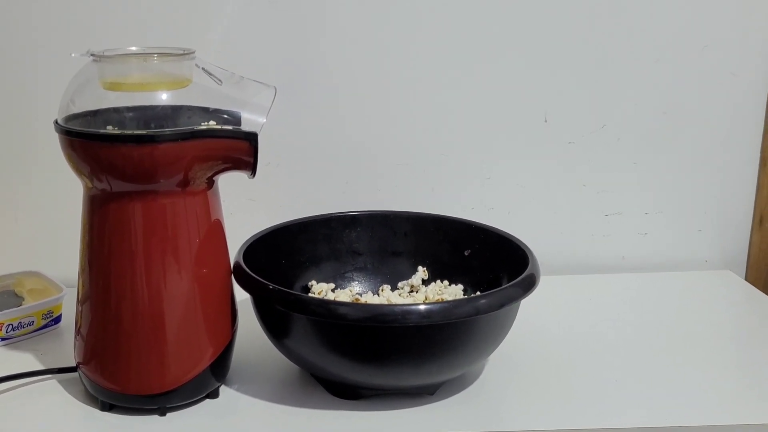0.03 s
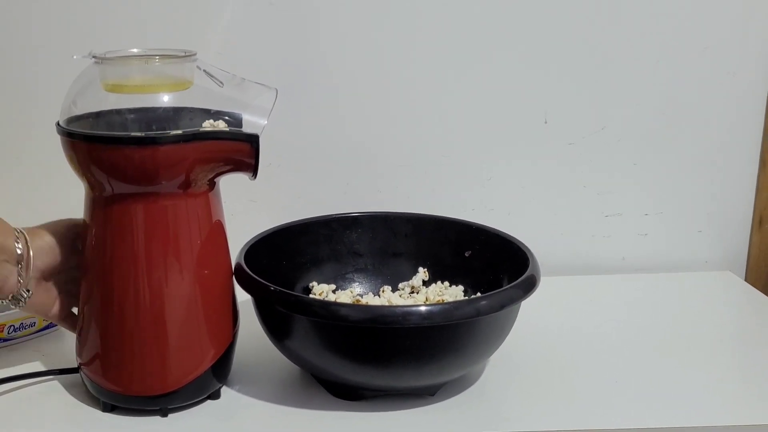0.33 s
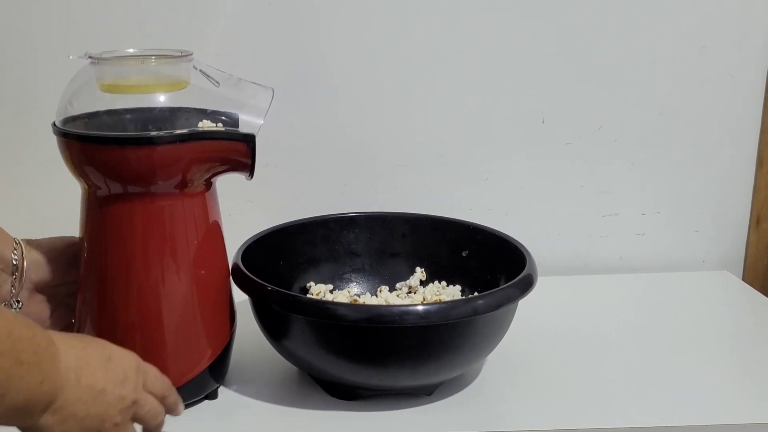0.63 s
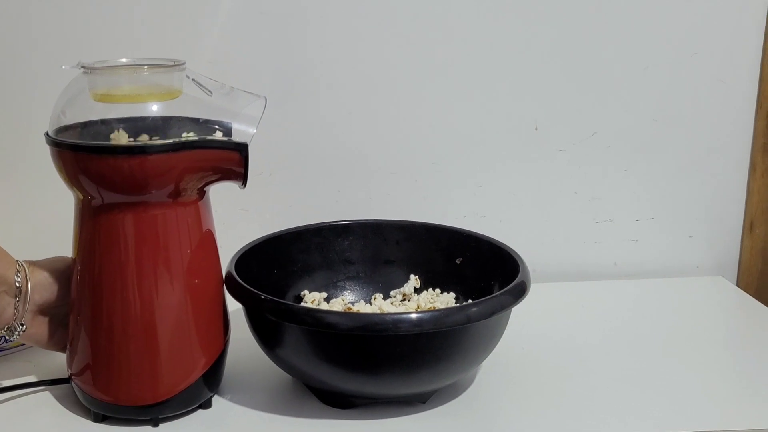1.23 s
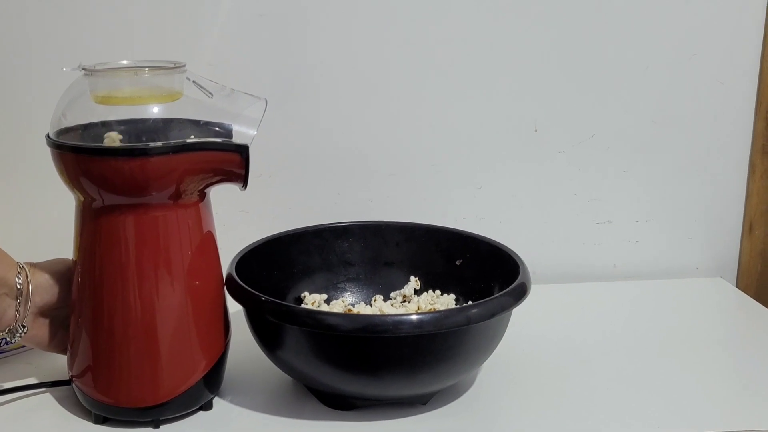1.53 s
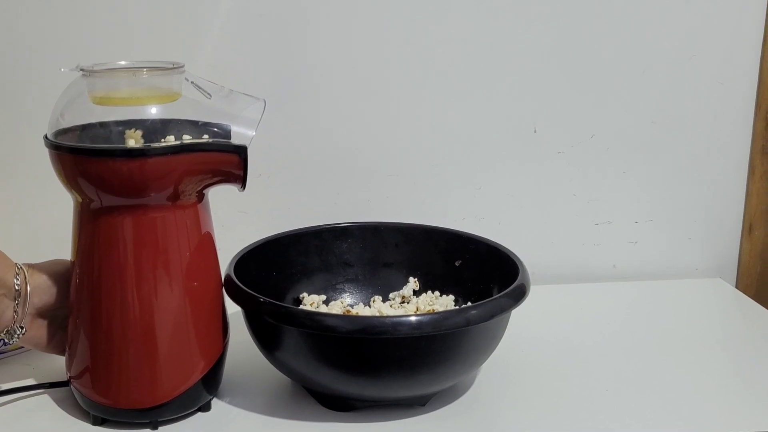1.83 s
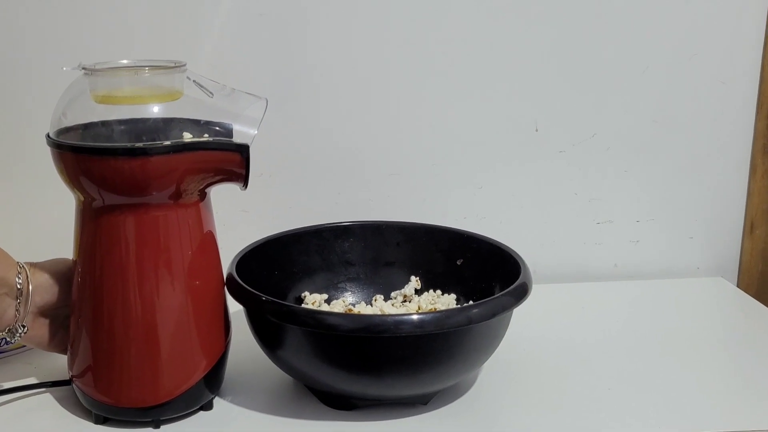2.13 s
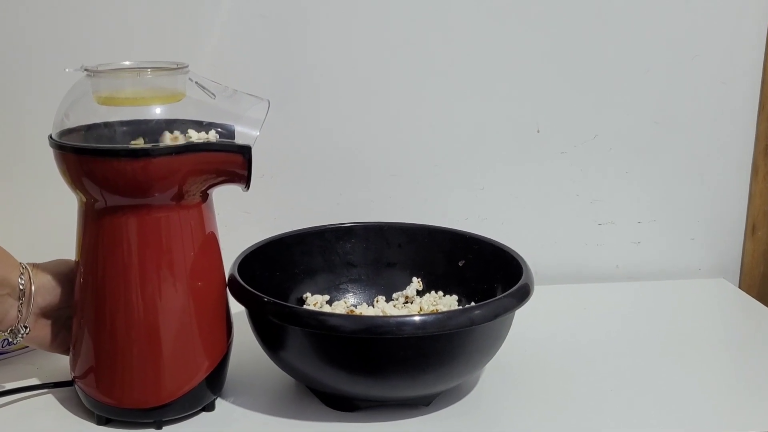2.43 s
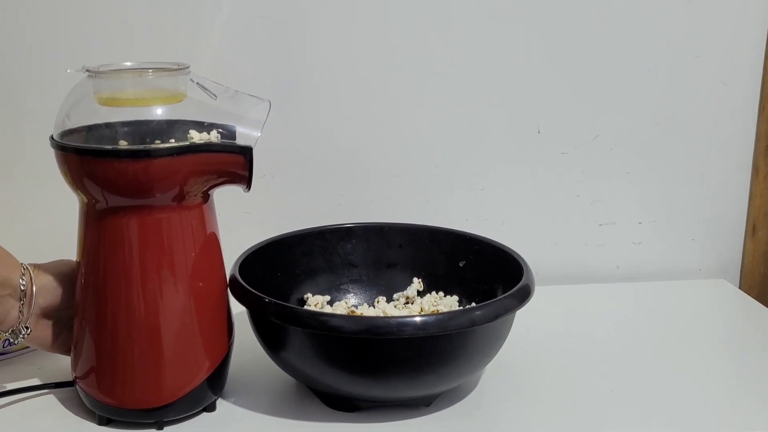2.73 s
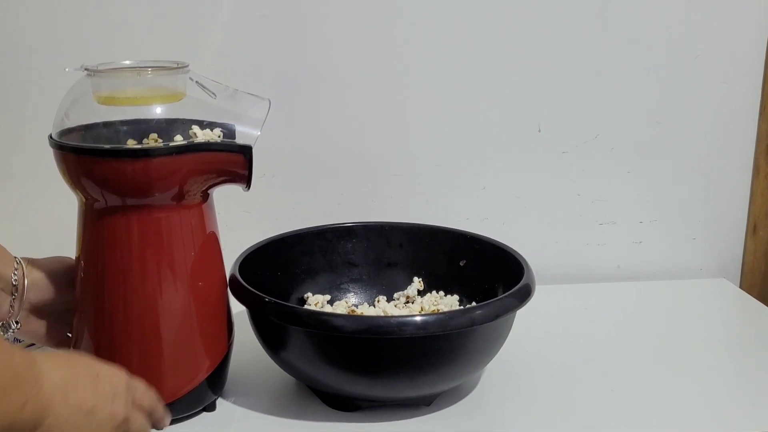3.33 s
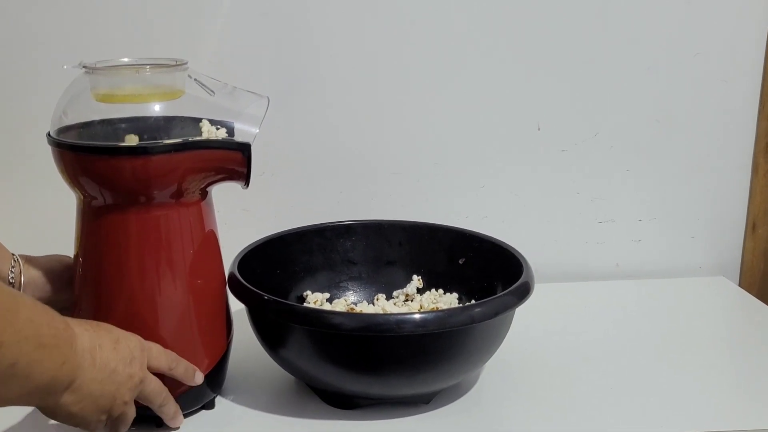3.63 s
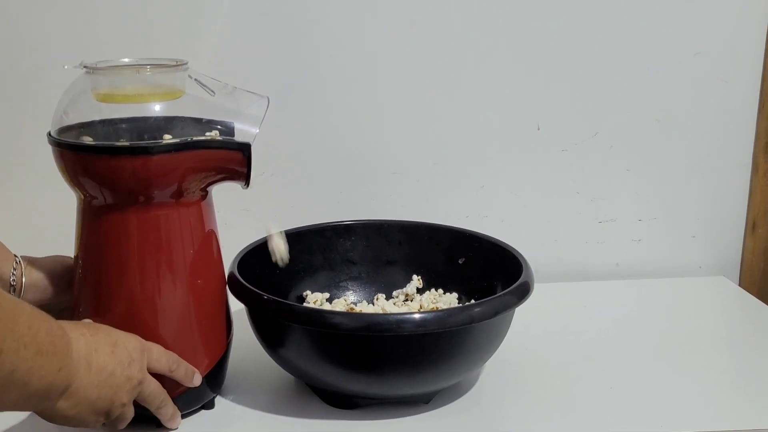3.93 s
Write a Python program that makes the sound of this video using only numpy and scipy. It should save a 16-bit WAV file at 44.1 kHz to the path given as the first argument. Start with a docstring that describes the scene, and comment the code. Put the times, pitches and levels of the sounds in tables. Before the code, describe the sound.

A hot air popcorn machine roars steadily in a small room, with a faint motor whine and kernels rattling against metal. A few kernels pop in the first half, and one more pops near the end.

```python
"""A hot-air popcorn machine in a small room. From the start, fan air roars through housing, chute and
hood over a faint motor whine, and swirling kernels rattle on the metal chamber in quick surges.
Four kernels burst between 0.7 and 1.7 s, each a crack and a puff of steam. At 2.25 s the sound drops
out for 12 ms; the rattle returns slightly louder, with deeper surges. A last kernel pops at 3.4 s,
and a faint whistle swells near the end."""
import sys
import numpy as np
from scipy import signal
from scipy.fft import rfft, irfft, next_fast_len
from scipy.io import wavfile
from scipy.ndimage import uniform_filter1d, map_coordinates

SR = 44100
rng = np.random.default_rng(int(sys.argv[2]) if len(sys.argv) > 2 else 0)


def transcribe(u):
    """Save the signal u as a 16-bit wav file named by the first command-line argument.

    u: samples, shape (n,) or (channels, n), limited to [-1, 1]; the rate is SR.
    q: integer samples, one column per channel.
    """
    v = np.clip(np.atleast_2d(u).T, -1, 1)
    q = np.round(v * 32767).astype(np.int16)
    wavfile.write(sys.argv[1], SR, q)


N = 176400

# Air noise spectra: freq_hz, relative_db
ROAR_SPECTRUM = [(12, -60), (25, -26), (58, -5), (98, -18.5), (148, -7.5), (190, -13.5), (225, -1.7),
                 (330, -0.5), (600, -5), (720, -8.5), (790, -7.5), (930, -4), (1030, -9.5), (1300, -20.5),
                 (1700, -47), (2800, -100)]
RUSH_SPECTRUM = [(800, -44), (1200, -1.5), (1300, 0.0), (1700, -6), (2000, -3.5), (2400, -4.5),
                 (3050, -8.5), (3600, -6.5), (4600, -28), (7000, -100)]
DRONE_SPECTRUM = [(700, -80), (815, -27), (840, 1.5), (857, -10.5), (873, 0.5), (905, -23.5), (1050, -80)]
WHISTLE_SPECTRUM = [(3600, -70), (3870, -14), (3930, 0), (3990, -14), (4300, -70)]
# Spectra of wall hits, hull crack and steam thump: freq_hz, relative_db
RATTLE_SPECTRUM = [(2000, -50), (3200, -13), (3600, -6), (5500, 1), (7000, -1.5), (9000, -9), (10100, -9.5),
                   (11500, -0.5), (13000, -12.5), (14400, -12.5), (15600, -15.5)]
CRACK_SPECTRUM = [(800, -22), (2400, -6.5), (3300, -12), (4000, -4), (4550, 2), (5800, 5.5), (7000, -0.5),
                  (9000, -4.5), (11500, 1), (15000, -18)]
THUMP_SPECTRUM = [(80, -30), (150, -16), (190, -16), (260, 1), (330, -2.5), (410, 0), (550, -7), (800, -19),
                  (1400, -24), (3000, -50)]
# Resonances of housing and chute, plastic hood, metal chamber: centre_hz, width_hz, boost_db
HOUSING_MODES = [(239, 40, 5.0), (282, 34, 7), (403, 41, 3.5), (436.4, 39, 8.5), (490.4, 22, 7),
                 (517, 31, 8.5), (736, 33, 4.5), (790.6, 65, 14.5), (839, 24, 6), (874.6, 49, 10.5),
                 (920.3, 49, 11.5), (977, 30, 8.5), (1017, 16, 3), (1053, 22, 5.5), (1126, 60, 6.5),
                 (1218, 63, 11.5)]
HOOD_MODES = [(1348, 28, 1.5), (1447, 42, 7.5), (1620, 86, 6), (2142, 19, 9.5), (2260, 32, 4.5),
              (2333, 68, 8.5), (2399, 45, 7), (2474, 34, 9), (2700, 160, 3.5), (2940, 74, 3)]
CHAMBER_MODES = [(3926, 140, 8.5), (4180, 140, 5), (4440, 190, 7.5), (5030, 150, 4.5), (5340, 81, 4.5),
                 (5740, 440, 3.5), (6530, 220, 4.5), (7750, 270, 4), (8280, 126, 8.5), (9190, 106, 6),
                 (9431, 300, 4), (10730, 138, 3.5), (11830, 100, 5.5), (12880, 119, 12)]
# Drift about the roar's base level: time_s, offset_db
ROAR_DRIFT_DB = [(0, 0), (.7, 0.5), (1.2, 0.24), (1.9, 0), (2.6, 1.04), (3.2, 0.5), (4, 0.9)]
# Source envelopes: time_s, level_db
RUSH_DB = [(0, -35), (1, -35.5), (2.24, -35.5), (2.28, -34.5), (3, -34), (4, -34.5)]
DRONE_DB = [(0, -32.5), (.28, -24), (.42, -32), (.62, -26), (1.05, -36), (1.65, -28.5), (2.1, -28.5),
            (2.6, -29.5), (3.05, -31.5), (3.22, -24), (3.5, -26), (3.62, -27.5), (3.8, -24), (4, -25)]
WHISTLE_DB = [(0, -58), (3.1, -54), (3.4, -49), (3.75, -42), (4, -53)]
RATTLE_DB = [(0, -33), (.6, -33), (1.2, -33), (1.7, -32.5), (2.24, -32.5), (2.28, -31.5), (2.88, -30.5),
             (3.25, -31.5), (3.68, -32), (4, -32)]
SHAFT_DB = [(0, -36), (.7, -40.5), (1.3, -48), (2, -50), (2.9, -44), (3.1, -35.5), (4, -36)]
MAINS_DB = [(0, -66), (1, -55.5), (2.65, -48.5), (4, -55.5)]
# Rattle surges: time_s, depth_db
SURGE_DEPTH_DB = [(0, .7), (.7, 1.5), (1.2, 1.1), (1.7, 1.4), (2.24, 1.2), (2.27, 2.5)]
# Bursting kernels: start_s, crack_db, length_s, brightness_db_per_octave, thump_db
BURSTS = [(0.7202, -21.5, 0.015, -6, -17), (1.2905, -20.5, 0.0068, -3.2, -18), (1.5883, -16, 0.006, 3, -22),
          (1.632, -32, 0.0036, 10, -42), (3.383, -26, 0.0093, 3, -41)]
# Tones held by the air stream: pitch_hz, level_db, waver_hz
HOUSING_TONES = [(435.3, -39, 4.1), (492, -36.5, 4)]
# Motor speed unsteadiness: time_s, speed_fraction
SPEED_WANDER = [(0, 0.003), (2.2, 0.00252), (2.3, .0006), (4, 0.00092)]
# Motor whine: shaft_multiple, level_db
WHINE_ORDERS = [(3, -50.5), (6, -57), (7, -57), (8, -49)]
# Likeness of the two microphones: freq_hz, coherence
MIC_COHERENCE = [(60, 0.91), (110, 0.94), (200, 0.97), (380, 0.97), (700, 0.68), (900, 1), (1290, 0.068),
                 (2380, 0.2), (4400, 0.13), (8120, 0.044), (15000, 0.038)]
# Microphone balance: freq_hz, left_minus_right_db
MIC_BALANCE_DB = [(60, -2.0), (73, 3), (88, -5), (110, -9), (130, -1), (160, -2.0), (190, -3), (230, 0.0),
                  (280, -0.5), (330, -3.5), (400, -3.5), (490, -5), (590, -1), (710, 6.5), (860, -4),
                  (1040, -2.5), (1260, -6.5), (1530, -1), (1850, -1.5), (2230, -5.5), (2700, -2), (3270, 2),
                  (3960, 2.5), (4790, 0.5), (5790, -10), (7000, -7.5), (8470, 7.5), (10200, -2), (12400, 3),
                  (15000, 5.0)]


def fan(roar_db=-21.5, roar_flutter_db=.5, rush_flutter_db=.68):
    """Turbulent air rings the housing, drones in the chute, rushes and whistles out of the hood."""
    roar_gain = amp(roar_db + curve(ROAR_DRIFT_DB) + roar_flutter_db * wobble(12))
    roar = roar_gain * coloured(noise(), ROAR_SPECTRUM, HOUSING_MODES)
    rush_gain = amp(curve(RUSH_DB) + rush_flutter_db * wobble(20))
    rush = rush_gain * coloured(noise(), RUSH_SPECTRUM, HOOD_MODES)
    drone = amp(curve(DRONE_DB)) * coloured(noise(), DRONE_SPECTRUM)
    whistle = amp(curve(WHISTLE_DB)) * coloured(noise(), WHISTLE_SPECTRUM)
    return roar + rush + drone + whistle


def kernel_rattle(ticks_per_s=5000, spread_db=2, hiss_share=.41, clump_db=.85,
                  surge_hz=43.1, surge_offset_s=.005, drift_turns=.043):
    """Kernels swept round the chamber tick and hiss on its wall in regular surges."""
    hits = rng.random((2, N)) < ticks_per_s / SR
    ticks = unit(hits * rng.choice([-1, 1], (2, N)) * amp(spread_db * noise()))
    impacts = np.sqrt(1 - hiss_share) * ticks + np.sqrt(hiss_share) * noise()
    rattle = coloured(impacts, RATTLE_SPECTRUM, CHAMBER_MODES)
    turns = surge_hz * (np.arange(N) / SR - surge_offset_s) + drift_turns * wobble(4.1)
    surge_db = curve(SURGE_DEPTH_DB) * np.sin(2 * np.pi * turns)
    return hood_comb(rattle) * amp(curve(RATTLE_DB) + surge_db + clump_db * wobble(60))


def pops(attack_s=.001, t60_s=.032, fade_db=3, crackle_db=1.0):
    """Each hull tears open in a short crackling burst with a hollow puff of steam."""
    out = np.zeros((2, N))
    for start_s, crack_db, length_s, db_per_octave, thump_db in BURSTS:
        age_s = np.arange(N) / SR - start_s
        attack = np.clip(age_s / attack_s, 0, 1)
        fade = amp(-fade_db * np.clip(age_s / length_s, 0, 1))
        release = amp(-60 * np.maximum(age_s - length_s, 0) / t60_s)
        tearing = noise() * amp(crackle_db * wobble(2000))
        spectrum = [(hz, db + db_per_octave * np.log2(hz)) for hz, db in CRACK_SPECTRUM]
        crack = amp(crack_db) * coloured(tearing, spectrum)
        thump = amp(thump_db) * coloured(noise(), THUMP_SPECTRUM)
        out += attack * fade * release * (crack + thump)
    return out


def air_tones(waver_db=3.0):
    """The air stream locks on to the housing in two soft, unsteady tones."""
    out = np.zeros(N)
    for pitch_hz, level_db, waver_hz in HOUSING_TONES:
        turns = np.cumsum(pitch_hz + waver_hz * wobble(14)) / SR
        out += amp(level_db + waver_db * wobble(8)) * np.sin(2 * np.pi * turns)
    return np.sqrt(2) * out


def motor(shaft_hz=225.6, mains_hz=60, waver_db=1.5):
    """Shaft hum, its wavering higher orders and faint mains hum."""
    turns = np.cumsum(shaft_hz * (1 + curve(SPEED_WANDER) * wobble(6))) / SR
    shaft = amp(curve(SHAFT_DB)) * np.sin(2 * np.pi * turns)
    whine = sum(amp(level_db + waver_db * wobble(10)) * np.sin(2 * np.pi * order * turns)
                for order, level_db in WHINE_ORDERS)
    mains_gain = amp(curve(MAINS_DB) + waver_db * wobble(6.1))
    mains = mains_gain * np.sin(2 * np.pi * mains_hz * np.arange(N) / SR)
    return np.sqrt(2) * (shaft + whine + mains)


def hood_comb(x, ripple_db=1.84, spacing_hz=22.07):
    """Reflections in the hood add static narrow peaks and dips, different at each microphone."""
    def response(hz):
        knots = rng.standard_normal((2, SR // 4))
        ripple = np.array([map_coordinates(side, [hz / spacing_hz], mode="wrap") for side in knots])
        return amp(ripple_db * ripple)
    return unit(filtered(x, response)) * np.std(x)


def room(x, level_db=-16, t60_s=.36):
    """Short diffuse tail of a small room."""
    time_s = np.arange(SR // 2) / SR
    tail = rng.standard_normal((2, len(time_s))) * amp(-60 * time_s / t60_s)
    return amp(level_db) * signal.fftconvolve(x, tail / np.linalg.norm(tail[0]), axes=1)[:, :N]


def amp(db):
    """Decibels to gain."""
    return 10 ** (np.asarray(db) / 20)


def unit(x):
    """Scale to rms 1."""
    return x / np.sqrt(np.mean(x ** 2) + 1e-20)


def noise():
    """Two independent white noises."""
    return rng.standard_normal((2, N))


def along(points, hz):
    """Interpolate (freq_hz, value) points on a log axis."""
    freq_hz, values = np.transpose(points)
    return np.interp(np.log(hz + 1), np.log(freq_hz + 1), values)


def curve(points):
    """Interpolate (time_s, value) points per sample; the last value holds."""
    return np.interp(np.arange(N) / SR, *np.transpose(points))


def wobble(knots_per_s):
    """Smooth random curve."""
    knots = rng.standard_normal(int(N * knots_per_s / SR) + 4)
    return map_coordinates(knots, [np.arange(N) * knots_per_s / SR])


def filtered(x, response):
    """Apply a complex frequency response."""
    size = next_fast_len(N + SR // 2)
    return irfft(rfft(x, size) * response(np.fft.rfftfreq(size, 1 / SR)), size)[..., :N]


def coloured(pair, spectrum, modes=()):
    """Shape two independent signals into partly coherent left and right, mid at rms 1."""
    def response(hz):
        spread_rad = np.arccos(np.clip(along(MIC_COHERENCE, hz), -.98, .98)) / 2
        mid_side = np.array([np.ones_like(spread_rad), np.tan(spread_rad)])
        peaks_db = sum(boost_db / (1 + (2 * (hz - centre_hz) / width_hz) ** 2)
                       for centre_hz, width_hz, boost_db in modes)
        return amp(along(spectrum, hz) + peaks_db) * mid_side
    mid, side = filtered(pair, response)
    return np.array([mid + side, mid - side]) / np.std(mid)


def scene():
    """The running machine, plus pops with their room tail."""
    bursts = pops()
    return fan() + air_tones() + motor() + kernel_rattle() + bursts + room(bursts)


def record(dry, left_lead_s=.00008, dropout_s=(2.2502, 2.2625), cutoff_hz=15850):
    """Colour and delay per microphone, one dropout, then a low-pass."""
    def microphones(hz):
        sides = np.array([[.5], [-.5]])
        gain = amp(sides * along(MIC_BALANCE_DB, hz))
        delay = np.exp(2j * np.pi * hz * sides * left_lead_s)
        return gain / np.sqrt(np.mean(gain ** 2, axis=0)) * delay
    time_s = np.arange(N) / SR
    live = (time_s < dropout_s[0]) | (time_s > dropout_s[1])
    gate = uniform_filter1d(live.astype(float), size=60)
    return filtered(filtered(dry, microphones) * gate, lambda hz: hz < cutoff_hz)


dry = scene()
out = record(dry)
transcribe(out)
```